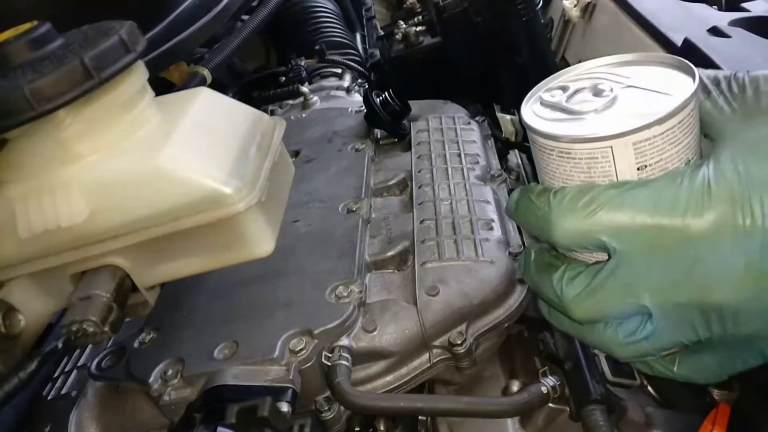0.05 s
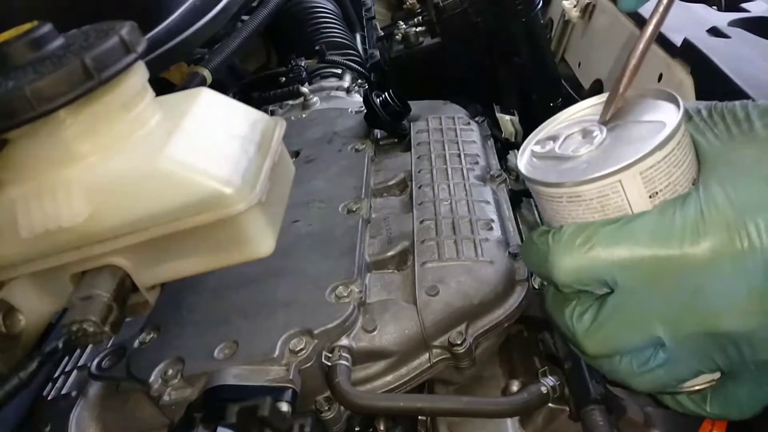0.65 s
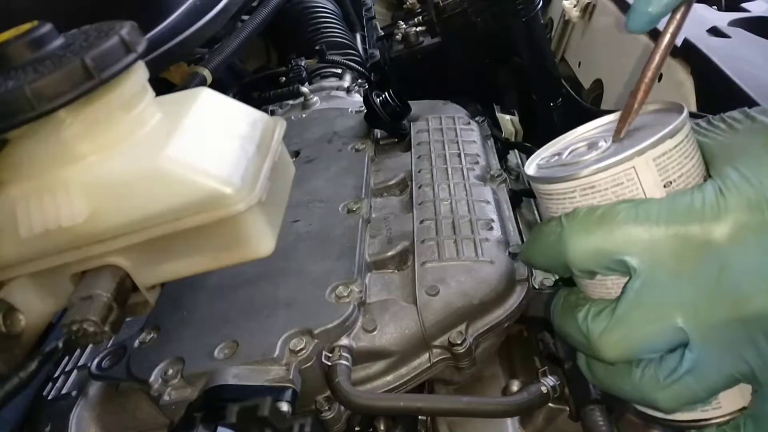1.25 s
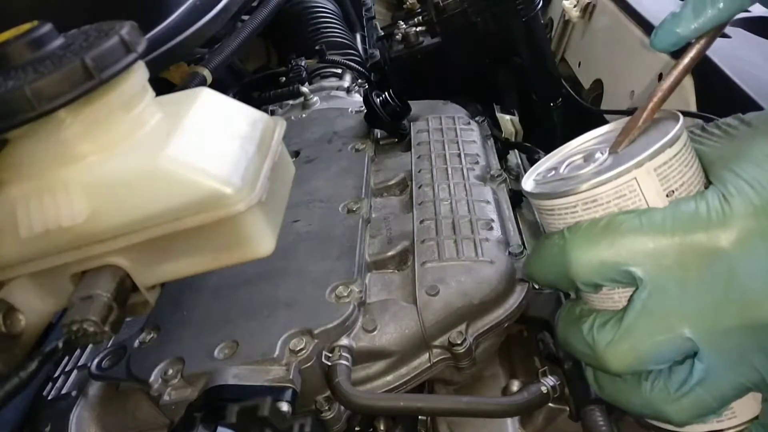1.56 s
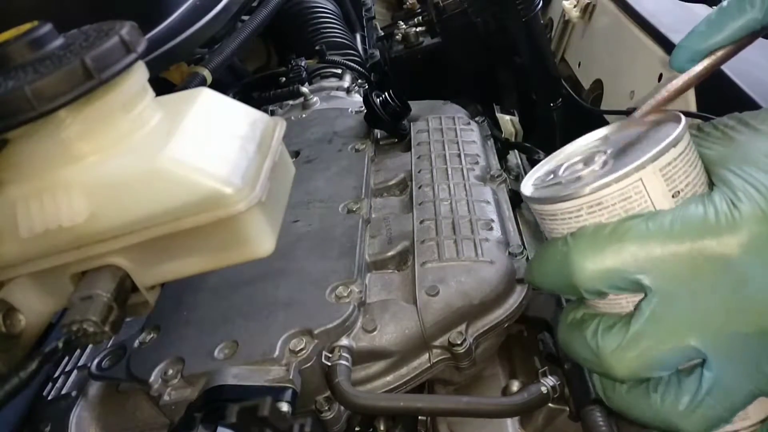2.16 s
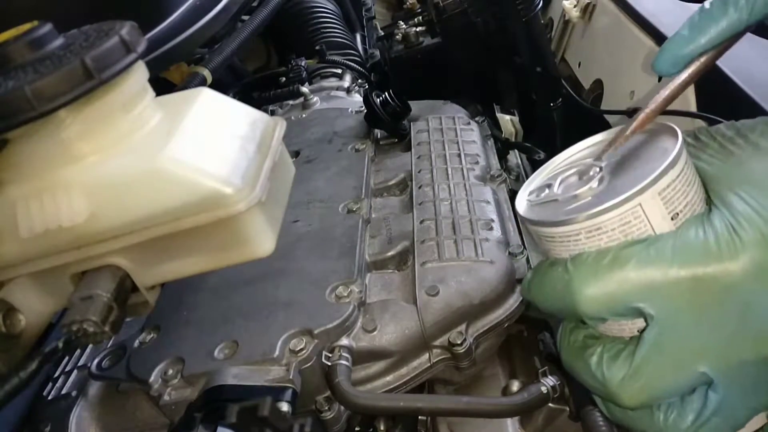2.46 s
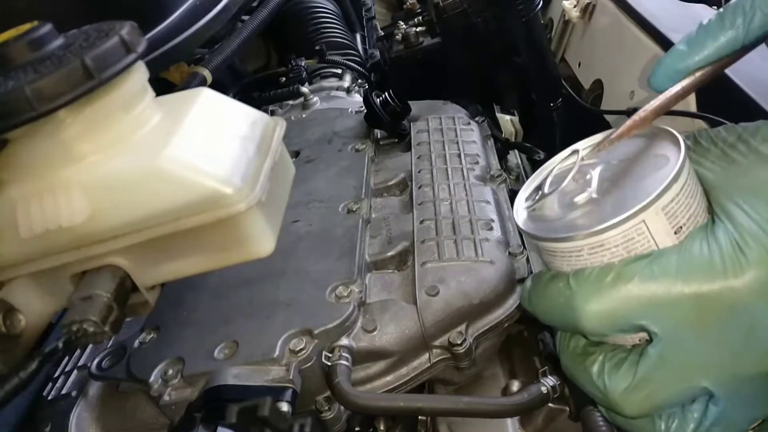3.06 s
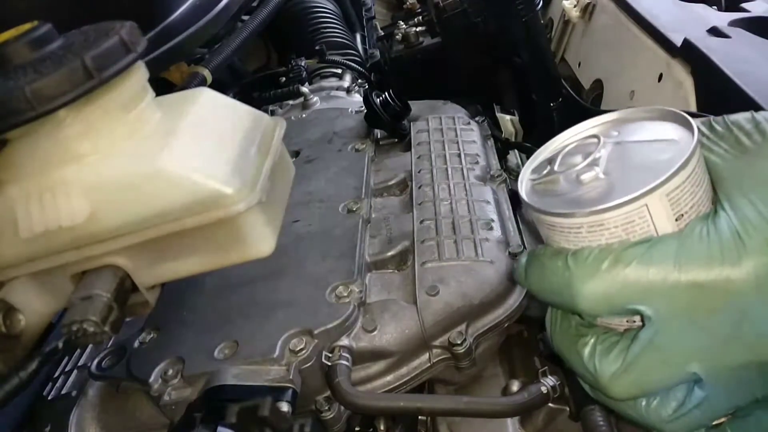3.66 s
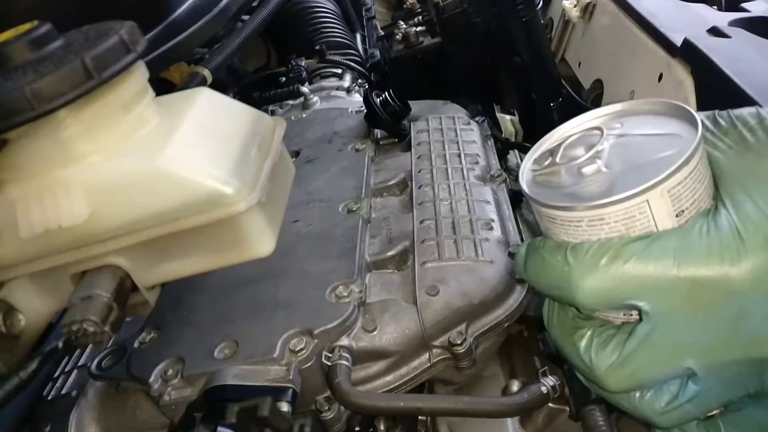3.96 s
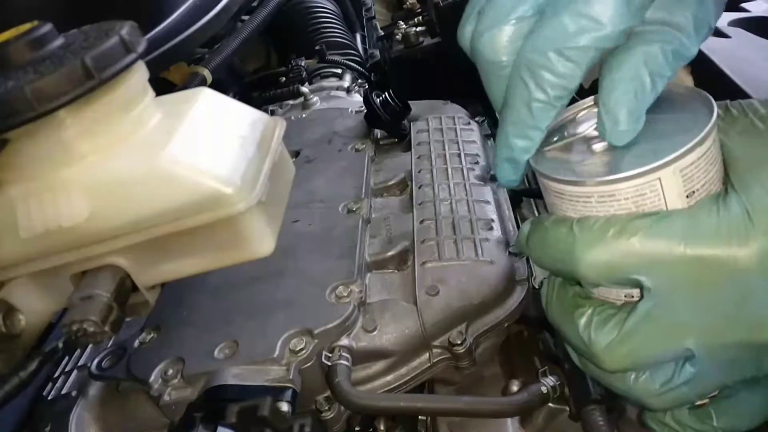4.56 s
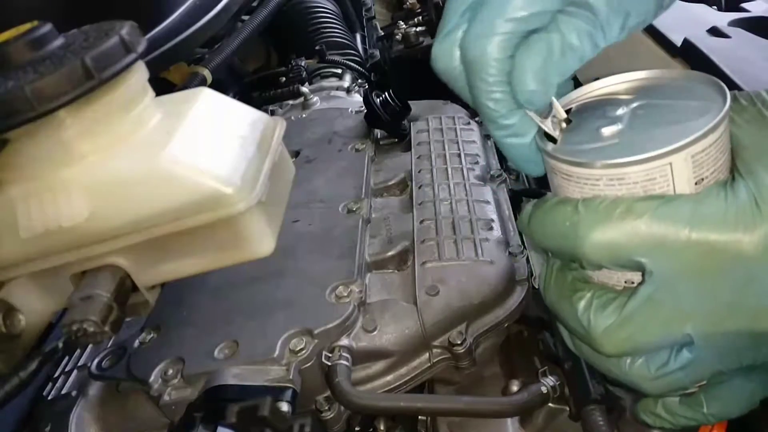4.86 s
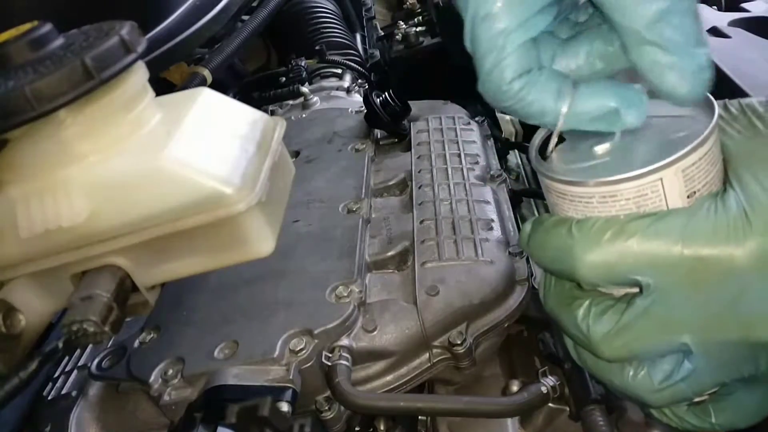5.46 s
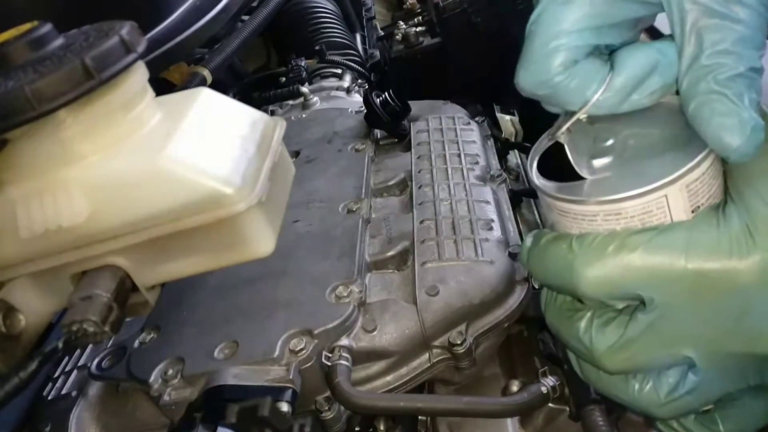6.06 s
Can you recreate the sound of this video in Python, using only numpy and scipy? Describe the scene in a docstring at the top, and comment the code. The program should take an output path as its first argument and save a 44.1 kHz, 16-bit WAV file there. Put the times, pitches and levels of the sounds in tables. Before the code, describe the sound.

A small metal can is handled close to the microphone in a quiet workshop, starting with light clicks, soft bumps and faint rubber glove rubbing. At about 0.75 seconds a steel blade clicks sharply under the tab, followed by smaller ticks and a single click near 1.7 seconds. At 2.3 seconds the seal bursts with a snap, a short hiss of gas and a low puff. More clicks and tiny scrapes lead to a ringing pop as the lid buckles at 3 seconds, with another click at 3.3. Around 4 seconds comes a clack with dull knocks of the hand. At 4.8 seconds the tab bends up in a quick cluster of sharp clicks. The seam creaks faintly from 5.4 seconds, then rips with a brief, gritty crack at 6 seconds. Soft handling and a last faint creak follow over low, steady room tone.

```python
"""Opening a ring-pull can

Gloved hands work on a small can, close up in a quiet workshop. A steel blade clicks and scrapes
under the tab, levering it until the seal bursts with a short hiss and the lid buckles with a pop.
Fingers bend the tab up and pull: the scored seam creaks and rips open in tiny fractures.
Underneath are soft knocks of the hand, rubber sliding on metal and the still air of the room."""
import sys
import numpy as np
from scipy import signal
from scipy.fft import rfft, irfft, next_fast_len
from scipy.io import wavfile
from scipy.ndimage import uniform_filter1d

SR = 44100
rng = np.random.default_rng(int(sys.argv[2]) if len(sys.argv) > 2 else 0)


def waveform_to_disk(signal):
    """Save audio, clipped to [-1, 1], as 16-bit WAV at the path in sys.argv[1]."""
    frames = np.transpose(np.atleast_2d(signal))
    scaled = np.clip(frames, -1, 1) * 32767
    samples = np.round(scaled).astype(np.int16)
    wavfile.write(sys.argv[1], SR, samples)


N = 278741
TIME = np.arange(N) / SR


# Metal hits of blade, tab and lid: (time [s], lid level [dB], lid pitch [Hz], tab level [dB],
# tab pitch [Hz], t60 of both [s], clatter level [dB], tick level [dB])
CLICKS = [ (0.0197, -36.5, 818, -47, 1960, 0.11, -36.5, -42),
          (0.1835, -28, 810, -22, 3640, 0.01, -34.5, -35), (0.7428, -17, 1078, -18, 2755, 0.046, -32, -22),
          (0.7428, -14.5, 1170, -24, 2994, 0.075, -21, -40),
          (0.7655, -8, 1286, -18.5, 2320, 0.021, -29, -31),
          (0.8324, -31.5, 1270, -29, 2090, 0.021, -40, -40),
          (0.8930, -31.5, 1450, -27.5, 2105, 0.04, -31.5, -41),
          (0.9660, -32, 1557, -23, 2026, 0.048, -30, -27.5),
          (1.6550, -19.5, 2030, -29, 2750, 0.018, -45, -62),
          (2.2869, -21, 576, -13.5, 1146, 0.033, -24.5, -29),
          (2.397, -30, 1120, -39, 1680, 0.088, -38, -55), (2.666, -24, 1520, -28, 1870, 0.016, -42, -32.5),
          (2.69, -25.5, 1128, -25, 1915, 0.047, -28, -44),
          (2.7272, -25, 1540, -24, 2167, 0.018, -34, -38.5),
          (2.8834, -13.5, 1833, -18, 2060, 0.035, -28, -34),
          (3.0178, -22.5, 1180, -42, 1950, 0.098, -28, -49),
          (3.3104, -26.5, 1800, -27.5, 2190, 0.052, -33, -26.5),
          (3.3122, -25.5, 3650, -25.5, 6180, 0.029, -37, -22),
          (3.3140, -40.5, 1553, -45.5, 3880, 0.25, -37, -41), (3.9472, -48, 840, -33, 2130, .035, -34, -33),
          (3.9578, -29, 814, -22.5, 2220, .048, -21.5, -21.5),
          (4.032, -38.5, 850, -39, 2260, 0.086, -31, -38), (4.7738, -27.5, 883, -34, 1900, 0.077, -39, -37),
          (4.7986, -21.5, 889, -23, 2070, .064, -28.5, -27), (4.8010, -33, 548, -25, 1747, 0.086, -40, -30),
          (4.8058, -14.5, 838, -20.5, 2125, 0.055, -31, -29),
          (4.8094, -16, 840, -16, 1850, 0.021, -30.5, -24.5),
          (4.8560, -38.5, 870, -56, 2100, .04, -43.5, -47), (5.503, -62, 844, -48, 5150, 0.083, -47, -42),
          (5.5259, -35, 858, -36, 1370, 0.047, -33, -33.5),
          (5.902, -49, 1470, -44.5, 3700, 0.06, -43.5, -43), (5.9307, -49, 1440, -45, 5120, .033, -42, -50),
          (5.9835, -30.5, 675, -28, 3860, 0.067, -29, -29),
          (5.987, -31, 2860, -26.5, 4800, 0.051, -37, -45), (6.002, -27, 2430, -29, 5070, 0.044, -46, -45),
          (5.9965, -18, 942, -35, 600, 0.052, -40, -23), ]
# Clatter, the dense modes of the struck can: (frequency [Hz], level [dB])
CLATTER_EQ = [(200, -10), (500, -21), (900, 0.5), (1500, 4.5), (2600, 1.5), (3800, 1), (5500, -2.5),
              (7500, -23.5), (10000, -24), (16000, -10)]
# Bright tick of metal contact: (frequency [Hz], level [dB])
TICK_EQ = [(1000, -37), (4000, -11), (6000, 0), (8000, -5), (10200, 5.5), (13000, 4), (16000, -3.5)]

def clicks(stiffen=0.0095, relax_s=0.011, crack_db=4, crack_s=0.00029, grip_s=0.18,
           clatter_t60_s=0.04, tick_share=0.55, rise_s=0.00029):
    """Each click rings lid and tab, tuned by how hard they are bent. Returns notes and clatter."""
    notes, clatter, t = np.zeros(N), np.zeros(N), np.arange(SR // 5) / SR
    warped = t + stiffen * relax_s * (1 - np.exp(-t / relax_s))  # a wide swing starts slightly sharp
    grip = np.exp(-(t / grip_s) ** 2)  # blade and fingers smother the ring
    crack = 1 + amp(crack_db) * np.exp(-t / crack_s)  # the first instant of contact is the hardest
    clatter_env = crack * dying(t, clatter_t60_s, rise_s)
    tick_env = crack * dying(t, clatter_t60_s * tick_share, rise_s)
    for s, lid_db, lid_hz, tab_db, tab_hz, t60, clatter_db, tick_db in CLICKS:
        ring = amp(lid_db) * sine(lid_hz, warped) + amp(tab_db) * sine(tab_hz, warped)
        add(notes, s, ring * dying(t, t60, rise_s=0.00065) * grip)
        add(clatter, s, amp(clatter_db) * noise(CLATTER_EQ, len(t)) * clatter_env)
        add(clatter, s, amp(tick_db) * noise(TICK_EQ, len(t)) * tick_env)
    return notes, clatter


# Body of the escaping gas: (frequency [Hz], level [dB])
JET_EQ = [(200, -25), (400, -32), (620, -16), (720, -11), (900, 0.5), (1150, 3), (1800, 1.5), (2600, -3),
          (3800, -3.5), (6000, -7), (8000, -30), (16000, -38)]
# Low thump of gas on the microphone: (frequency [Hz], level [dB])
PUFF_EQ = [(15, -28), (35, -23), (55, 9.5), (90, -8.5), (150, -9), (260, -28), (600, -26), (2000, -80)]

def gas_jet(start_s=2.2865, rise_s=0.00017, sputter_db=1.0, flutter_hz=52):
    """Gas sputters through the split seal: a hiss and a puff that stay level briefly, then fade."""
    hiss, puff, t = np.zeros(N), np.zeros(N), np.arange(SR // 3) / SR
    sputter = amp(sputter_db * wobble(len(t), smooth_samples=80))
    body = amp(-22.5) * held(t, rise_s, hold_s=0.036, t60_s=0.36) * noise(JET_EQ, len(t))
    fizz = amp(-27.5) * held(t, rise_s, hold_s=0.044, t60_s=0.26) * noise(TICK_EQ, len(t))
    add(hiss, start_s, sputter * (body + fizz))
    gust = noise(PUFF_EQ, len(t)) + sine(flutter_hz, t)  # the puff rocks the air at the microphone
    add(puff, start_s, amp(-24.5) * gust * held(t, rise_s, hold_s=0.038, t60_s=0.074))
    return hiss, puff


# Rim resonances, shaken by the buckling lid: (frequency [Hz], width [Hz], level [dB])
RIM_MODES = [(1970, 130, -3), (3350, 80, -5), (3720, 92, -5.5)]

def lid_buckle(start_s=3.0172, rise_s=0.00032, lid_hz=902, overtone_hz=1666,
               sharp_hz=190, sharp_s=0.0039, sag_hz=130.6, slack_db=-3, tick_db=-11):
    """The lid pops through: its note starts sharp, sags while the sheet is slack, and settles."""
    pop, rattle, t = np.zeros(N), np.zeros(N), np.arange(SR // 3) / SR
    slack = np.exp(-((t - 0.0135) / 0.0095) ** 2)
    pitch_hz = lid_hz + sharp_hz * np.exp(-t / sharp_s) - sag_hz * slack
    phase = 2 * np.pi * np.cumsum(pitch_hz) / SR
    swing = amp(-12 + slack_db * slack) * held(t, rise_s, hold_s=0.034, t60_s=0.099)
    swing += amp(-49) * dying(t, t60_s=0.55, rise_s=rise_s)  # faint after-ring
    overtone = amp(-19) * held(t, rise_s, hold_s=0.0064, t60_s=0.067) * sine(overtone_hz, t)
    add(pop, start_s, swing * np.sin(phase) + overtone)
    rim = sum(amp(db) * hum(hz, width, len(t)) for hz, width, db in RIM_MODES)
    chatter = noise(CLATTER_EQ, len(t)) + amp(tick_db) * noise(TICK_EQ, len(t))
    chatter *= unit(1 + 0.99 * np.sin(phase))  # the tab rattles once a swing
    add(rattle, start_s, amp(-24) * held(t, rise_s, hold_s=0.0092, t60_s=0.13) * (chatter + rim))
    return pop, rattle


# Pulls, each ripping a stretch of seam: (time [s], hold [s], ring level [dB], rasp level [dB])
PULLS = [(5.38, 0.065, -48, -76), (5.478, 0.066, -52.5, -54), (5.6, .035, -61, -60),
         (5.901, 0.029, -54.5, -52.5), (5.981, 0.023, -38, -33.5), (5.995, 0.014, -27.5, -34.5),
         (6.025, .023, -45, -67), (6.299, 0.025, -52.5, -66)]
# Lid resonances under the tearing seam: (frequency [Hz], width [Hz], level [dB])
SEAM_MODES = [(872, 63, 11), (1474, 88, 10.5), (2430, 95, 4), (2760, 50, -19), (3600, 84, -1),
              (4950, 55, -10), (5060, 70, -5), (5580, 120, -12)]

def seam_tear(cracks_per_s=2400, spread_db=4.0, tick_db=-1):
    """The score line fails in tiny fractures. Returns the ring of the lid and the rasp."""
    ring, rasp, t = np.zeros(N), np.zeros(N), np.arange(SR // 6) / SR
    for s, hold_s, ring_db, rasp_db in PULLS:
        sizes = amp(spread_db * np.minimum(rng.exponential(1, len(t)), 3))
        sizes *= rng.choice([-1, 1], len(t))
        cracks = (rng.random(len(t)) < cracks_per_s / SR) * sizes
        modes = sum((-1) ** k * amp(db) * resonate(cracks, hz, width)
                    for k, (hz, width, db) in enumerate(SEAM_MODES))
        grit = colour(cracks, CLATTER_EQ) + amp(tick_db) * colour(cracks, TICK_EQ)
        effort = held(t, rise_s=0.0038, hold_s=hold_s, t60_s=0.029)
        add(ring, s, amp(ring_db) * effort * unit(modes))
        add(rasp, s, amp(rasp_db) * effort * grit)
    low_cut = signal.butter(4, 520, "high", fs=SR, output="sos")  # a small lid radiates no bass
    return signal.sosfilt(low_cut, ring), rasp


# Blade and lid sliding over metal: (centre time [s], half length [s], hum pitch [Hz],
# hum level [dB], rasp level [dB], bright rasp level [dB])
SCRAPES = [(0.809, 0.005, 3100, -43, -59, -47), (2.689, 0.0022, 1460, -33, -41, -40),
           (2.817, 0.0076, 1890, -39.5, -43.5, -43.5), (2.906, 0.02, 1170, -47, -44, -47.5),
           (3.299, 0.015, 2010, -43, -48, -47), (4.063, 0.012, 2250, -54, -47, -41.5),
           (5.982, 0.003, 2720, -41, -47, -60)]

def scrapes(width_hz=120):
    """Short slides: a swell of friction noise that sets one mode of the lid humming."""
    out = np.zeros(N)
    for s, half, hz, hum_db, rasp_db, bright_db in SCRAPES:
        t = np.arange(-3 * half, 3 * half, 1 / SR)
        tone = amp(hum_db) * hum(hz, width_hz, len(t))
        rasp = amp(rasp_db) * noise(CLATTER_EQ, len(t)) + amp(bright_db) * noise(TICK_EQ, len(t))
        add(out, s + t[0], (tone + rasp) * np.exp(-(t / half) ** 2))
    return out


# High resonances of the can's wall: (frequency [Hz], width [Hz], relative level [dB])
WALL_MODES = [(1134, 48, -6), (1550, 8.8, -0.5), (1920, 51, -1), (2135, 23, 1.5), (2543, 12, 5),
              (2794, 190, -4.5), (3289, 33, 5), (3770, 41, 2), (4074, 49, 1.5), (4560, 30, -1),
              (4680, 51, -1.5), (5330, 66, -3), (5830, 40, -8), (6620, 49, 5.5), (7700, 35, 3),
              (9540, 35, -5), (9700, 48, 0), (10300, 58, -4), (10900, 65, -10), (11750, 17, -1),
              (11800, 50, -6), (13040, 99, 0.5), (13500, 35, 0), (14000, 27, -13), (14400, 38, -8),
              (15500, 35, -9)]

def can_wall(x, modes_db, trim_db=-3, lap_s=0.0011, lap_gain=0.047):
    """Bending waves come back round the rim; the wall's modes ring on."""
    lap = lap_gain * np.interp(TIME - lap_s, TIME, x)
    modes = sum(amp(db) * resonate(x, hz, width) for hz, width, db in WALL_MODES)
    return amp(trim_db) * (x + lap + amp(modes_db) * modes)


# Dull thuds of hand and can: (time [s], level [dB], pitch [Hz], t60 [s])
BUMPS = [(0.023, -31, 254.4, .09), (0.039, -31.5, 165.5, 0.15), (0.189, -31, 243, 0.085),
         (0.212, -28.5, 150.5, 0.076), (2.287, -17, 169.5, 0.051), (2.287, -27.5, 374, 0.049),
         (3.02, -16, 199, 0.021), (3.023, -29, 58.6, 0.079), (3.960, -22, 271, 0.093),
         (3.964, -24, 166, 0.17), (3.986, -22, 158, 0.063), (3.992, -34, 95.5, .16),
         (4.056, -38, 190.5, 0.21), (6.154, -53, 147, .15), (6.195, -49, 128, 0.093)]

def bumps(roughness=0.3):
    """Soft, heavily damped knocks through the gloved hand."""
    out, t = np.zeros(N), np.arange(SR // 3) / SR
    for s, db, hz, t60 in BUMPS:
        thud = unit(resonate(hum(hz, width_hz=hz, size=len(t)), hz, width_hz=hz))
        body = sine(hz, t) + roughness * thud
        add(out, s, amp(db) * body * dying(t, t60, rise_s=0.0012))
    return out


# Rubber sliding on the can: (centre time [s], half length [s], level [dB])
RUBS = [(0.03, 0.061, -54), (0.17, 0.057, -52.5), (0.3, 0.022, -56.5), (0.5, 0.13, -52.5),
        (1.28, 0.14, -55.5), (1.66, .07, -58.5), (2.9, 0.015, -47), (3.52, 0.24, -57.5), (4.2, 0.24, -61.5),
        (4.57, 0.042, -58), (5.03, .06, -65), (5.255, .025, -53.5), (5.415, 0.039, -51),
        (5.52, 0.044, -48.5), (5.62, .05, -57)]
# Thin hiss of that rubber: (frequency [Hz], level [dB])
RUB_EQ = [(1000, -27), (4000, -5), (6000, 0.5), (8000, -9), (10000, 3), (12500, 3), (14500, -2.5),
          (16000, 1)]
# The wrist shifting its grip: (centre time [s], half length [s], level [dB])
GRIP_SHIFTS = [(0.055, 0.036, -41), (0.22, 0.11, -46.5), (0.79, .06, -50.5), (1.13, 0.047, -52),
               (4.04, 0.08, -39.5), (6.19, 0.085, -50.5)]
# Low handling rumble: (frequency [Hz], level [dB])
GRIP_EQ = [(30, -31), (60, -30), (85, 4.5), (170, 1.5), (215, -11.5), (280, -3), (400, -26.5), (900, -16.5),
           (3000, -70)]

def gloves(grain_db=1.4, touch_db=-63, wander_db=1.1):
    """A faint, finely grained hiss of rubber on metal, and the rumble of the shifting grip."""
    grain = amp(grain_db * wobble(N, smooth_samples=90))
    touch = amp(touch_db - wander_db * wobble(N, smooth_samples=SR // 5))  # the hand never rests
    sliding = np.hypot(swells(RUBS), touch)
    return sliding * grain * noise(RUB_EQ) + swells(GRIP_SHIFTS) * noise(GRIP_EQ)


# Reverb decay of the workshop: (frequency [Hz], t60 [s])
ROOM_DECAY = [(100, 0.39), (500, 0.22), (1000, 0.42), (3500, 0.27), (7000, 0.34), (14000, 0.1)]

def room(x, taps_per_s=4000, build_s=0.0015, treble_db=-7, bass_db=-8):
    """Sparse reflections from an engine bay and the walls, each band dying at its own speed."""
    taps = rng.choice([-1., 1.], SR) * (rng.random(SR) < taps_per_s / SR)
    hz, t, bands = signal.stft(taps, SR, nperseg=256)
    tone = amp(read([(300, bass_db), (900, 0), (4000, 0), (10000, treble_db)], hz))[:, None]
    decay = np.exp(-np.log(1000) * t / read(ROOM_DECAY, hz)[:, None])
    tail = signal.istft(bands * tone * decay, SR, nperseg=256)[1]
    tail *= 1 - np.exp(-np.arange(len(tail)) / SR / build_s)
    return signal.fftconvolve(x, tail / np.linalg.norm(tail))[:N]


# Room tone: (frequency [Hz], level [dB])
AIR_EQ = [(20, -29), (40, -7), (62, 8.5), (100, 3.5), (170, 1), (280, -3.5), (450, -7), (800, -5),
          (1500, -1.5), (2200, -3.5), (3500, -6.5), (5500, -12.5), (8000, -25), (16000, -22.5)]

def air(level_db=-53):
    """The still air of the workshop, a steady bed of dark noise."""
    return amp(level_db) * noise(AIR_EQ)


def amp(db):
    """Decibels to gain."""
    return 10 ** (np.asarray(db) / 20)


def unit(x):
    """Scales to rms 1."""
    return x / np.sqrt(np.mean(x ** 2) + 1e-20)


def sine(hz, t):
    """A pure tone."""
    return np.sin(2 * np.pi * hz * t)


def read(points, hz):
    """Reads a curve on a log-frequency axis."""
    f, value = np.transpose(points)
    return np.interp(np.log(hz + 1), np.log(f + 1), value)


def colour(x, eq):
    """Shapes x with an EQ curve, at rms 1."""
    size = next_fast_len(len(x))
    gain = amp(read(eq, np.fft.rfftfreq(size, 1 / SR)))
    return unit(irfft(rfft(x, size) * gain, size)[:len(x)])


def noise(eq, size=N):
    """Noise shaped by an EQ curve, at rms 1."""
    return colour(rng.standard_normal(size), eq)


def wobble(size, smooth_samples):
    """Smoothed random modulation, at rms 1."""
    return unit(uniform_filter1d(rng.standard_normal(size), smooth_samples))


def resonate(x, hz, width_hz):
    """Rings one mode with x."""
    r = np.exp(-np.pi * width_hz / SR)
    return 2 * signal.lfilter([1 - r], [1, -r * np.exp(2j * np.pi * hz / SR)], x).real


def hum(hz, width_hz, size):
    """One mode driven by noise, at rms 1."""
    return unit(resonate(rng.standard_normal(size), hz, width_hz))


def held(t, rise_s, hold_s, t60_s):
    """Envelope of a rush: rise, hold, exponential fall."""
    return (1 - np.exp(-t / rise_s)) * np.exp(-np.log(1000) * np.maximum(t - hold_s, 0) / t60_s)


def dying(t, t60_s, rise_s):
    """Envelope of a hit: quick rise, exponential fall."""
    return held(t, rise_s, 0, t60_s)


def swells(rows):
    """Envelope of smooth hand movements, each speeding up and slowing down."""
    return sum(amp(db) * np.exp(-((TIME - s) / half) ** 2) for s, half, db in rows)


def add(mix, s, sound):
    """Mixes a sound in at time s."""
    part = mix[max(0, round(s * SR)):][:len(sound)]
    part += sound[:len(part)]


def scene():
    """The can close by, the workshop around it, in mono."""
    notes, clatter = clicks()
    ring, rasp = seam_tear()
    hiss, puff = gas_jet()
    pop, rattle = lid_buckle()
    sends = [  # (sound, reverb send [dB])
        (notes + ring + bumps(), -27),
        (can_wall(clatter + rasp + scrapes(), modes_db=-1), -17),
        (can_wall(hiss, modes_db=2), -19),
        (pop, -22),
        (can_wall(rattle, modes_db=-1), -11),
    ]
    direct = sum(sound for sound, db in sends)
    reverb = room(sum(amp(db) * sound for sound, db in sends))
    return (direct + reverb + puff + gloves() + air())[None]


def record(dry, ceiling=0.32, high_cut_hz=16100):
    """A soft clip rounds the loudest peaks, then a steep high cut trims the top."""
    rounded = dry / (1 + (dry / ceiling) ** 4) ** (1 / 4)
    high_cut = signal.firwin(511, high_cut_hz, window=("kaiser", 9), fs=SR)
    return signal.oaconvolve(rounded, high_cut[None], "same")


dry = scene()
out = record(dry)
waveform_to_disk(out)
```